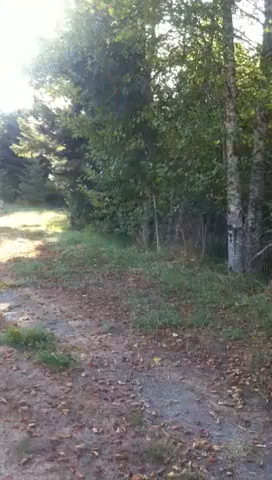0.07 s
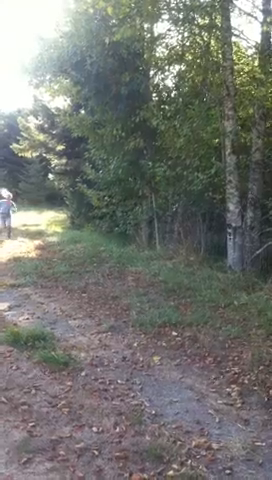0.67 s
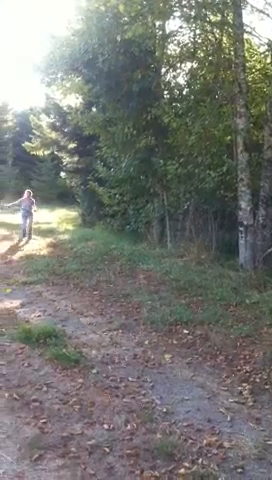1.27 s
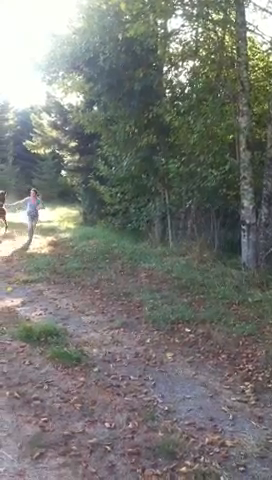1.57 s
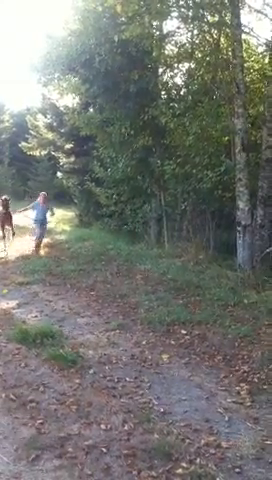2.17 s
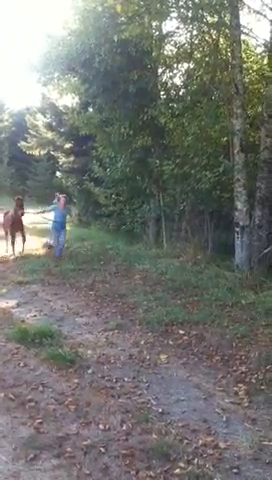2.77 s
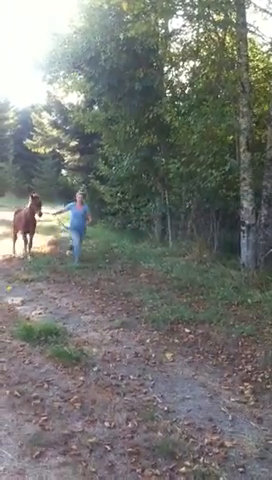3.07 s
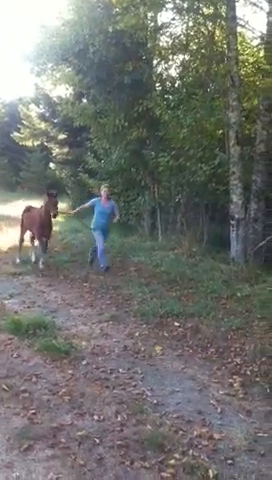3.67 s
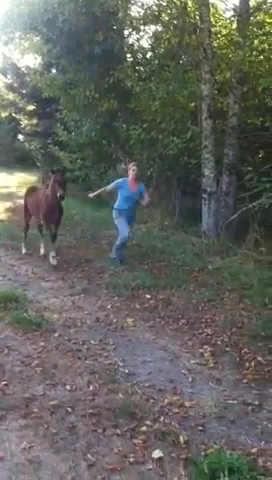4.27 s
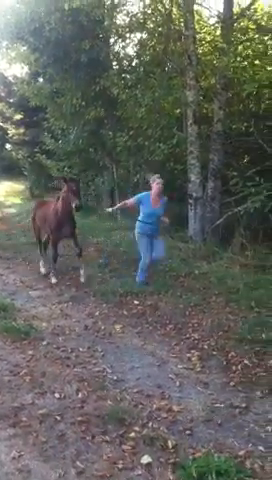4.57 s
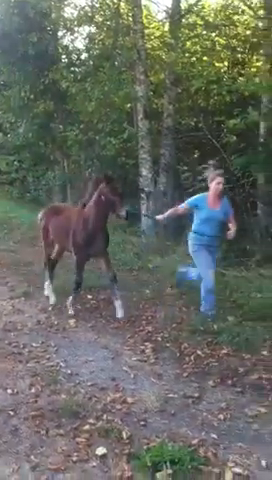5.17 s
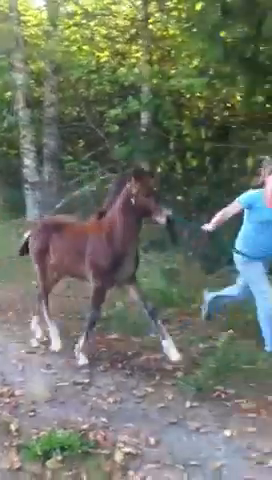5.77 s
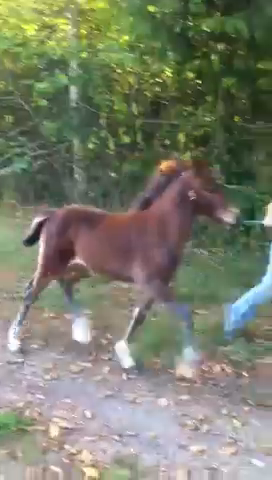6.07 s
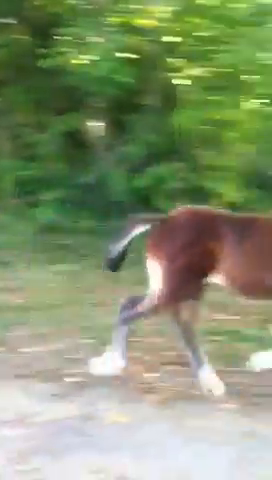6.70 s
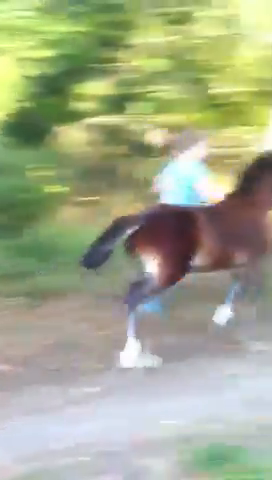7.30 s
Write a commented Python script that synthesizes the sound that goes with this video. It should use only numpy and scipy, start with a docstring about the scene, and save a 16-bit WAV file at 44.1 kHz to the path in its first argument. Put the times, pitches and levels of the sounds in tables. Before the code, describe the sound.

Against a quiet woodland hiss and a soft far-off roar, uneven footfalls approach through dry leaves. A running person and a trotting foal get steadily louder, crackling over leaf litter, twigs and a little gravel with a slight echo. Near the stationary microphone the steps sound drier, with dull thuds, hollow hoof knocks and the ticking of kicked leaves, before they begin to recede.

```python
"""A foal trots beside a running person on a woodland track, heard from one fixed mono microphone.
They start 16 to 18 m off, pass at about 3 m some six seconds in, and begin to move away.
Hooves and shoes sweep through dry leaves, snap twigs, grind gravel and thud on packed earth.
The trees scatter a short echo; behind it all lie a soft, distant roar and a fine hiss."""
import sys
import numpy as np
from scipy import signal
from scipy.io import wavfile
from scipy.ndimage import uniform_filter1d

SR = 44100
rng = np.random.default_rng(int(sys.argv[2]) if len(sys.argv) > 2 else 0)


def master_out(mix):
    """Clip the mix to full scale and print it as 16-bit PCM to the path in sys.argv[1]."""
    frames = np.transpose(np.atleast_2d(mix))
    ceiling = np.clip(frames, -1, 1)
    pcm = np.round(ceiling * 32767).astype(np.int16)
    wavfile.write(sys.argv[1], SR, pcm)


N = 332514
TIME = np.arange(N) / SR

# A foot ploughs into the litter: (time [s], relative level [dB], time to full weight [s], crispness [dB])
STEPS = [ (.766, -48.5, 0.022, 5), (0.805, -39, 0.0056, 4), (1.068, -47.5, 0.0071, 9),
         (1.145, -46.5, 0.014, 0), (1.38, -46.5, .03, -2.5), (1.415, -37.5, 0.074, 2),
         (1.668, -42, 0.0076, 1), (1.743, -34, 0.052, -1), (1.89, -47, .015, -3),
         (1.988, -41.5, 0.017, -6.5), (2.111, -33.5, 0.029, 1), (2.167, -30, 0.012, 0),
         (2.345, -39.5, 0.015, -1.5), (2.41, -40, 0.056, -2.5), (2.49, -33.5, .025, 2),
         (2.725, -36.5, 0.042, 2.5), (2.859, -34, .018, -0.5), (3.01, -35.5, 0.044, -1.5),
         (3.112, -36.5, 0.024, -1.5), (3.178, -38, 0.0084, 4), (3.30, -46, .06, 0.5),
         (3.453, -40, 0.024, -2.5), (3.56, -45, .012, 8), (3.63, -43, 0.04, 0.5), (3.79, -48, 0.065, 2.5),
         (3.861, -41, 0.073, 0.5), (4.098, -44, 0.12, 2.5), (4.242, -35.5, .015, -1),
         (4.376, -49.5, 0.049, -1.5), (4.462, -42, 0.025, -2.5), (4.53, -37, 0.049, 0.5),
         (4.765, -53, 0.086, -1), (4.831, -35, 0.11, -0.5), (5.083, -37, 0.18, 0),
         (5.391, -42.5, 0.027, 1.5), (5.424, -31.5, 0.0022, -0.5), (5.522, -33, 0.062, 1),
         (5.686, -35.5, 0.016, -2), (5.789, -41, 0.067, -5.5), (5.825, -33, 0.095, 2),
         (5.987, -38.5, .004, 4), (6.05, -45, 0.0047, 1), (6.121, -50, 0.072, 1.5),
         (6.198, -42.5, 0.006, -10), (6.236, -35.5, 0.053, 2), (6.428, -54.5, 0.0056, -7),
         (6.509, -46, 0.059, -2), (6.575, -36.5, 0.069, 0.5), (6.812, -33.5, 0.0069, -4),
         (6.89, -39.5, 0.025, 5.5), (6.949, -40.5, 0.013, 4.5), (7.019, -46.5, 0.02, 5),
         (7.081, -33.5, 0.0029, 0), (7.101, -47, 0.019, 3), (7.237, -44.5, 0.045, -1),
         (7.361, -38.5, 0.0025, -4.5)]
# Spectrum of dry stalks splintering: (frequency [Hz], level [dB])
TWIG_SPECTRUM = [(100, -29), (900, -17.5), (2000, -6), (5000, -5), (9000, 0), (16000, -7)]


def from_db(db):
    """Decibels to gain."""
    return 10 ** (np.asarray(db) / 20)


def unit(x):
    """Scales to rms 1."""
    return x / np.sqrt(np.mean(x ** 2) + 1e-20)


def at_time(points, s):
    """Reads a table along its time axis."""
    return np.interp(s, *np.transpose(points))


def at_frequency(points, hz):
    """Reads a table along a log-frequency axis."""
    f, value = np.transpose(points)
    return np.interp(np.log(hz + 1), np.log(f), value)


def add(mix, s, sound):
    """Mixes a sound in at time s."""
    part = mix[max(round(s * SR), 0):][:len(sound)]
    part += sound[:len(part)]


def colour(x, spectrum, size=2048):
    """Causal filter with the given spectrum, so that clicks stay sharp."""
    hz = abs(np.fft.fftfreq(size, 1 / SR))
    log_gain = np.log(from_db(at_frequency(spectrum, hz)))
    taps = np.fft.ifft(np.exp(np.conj(signal.hilbert(log_gain)))).real
    return signal.oaconvolve(x, taps)[:len(x)]


def mottle(x, depth_db, span_s, span_hz, size=256):
    """Lets the colour drift in random patches of time and frequency."""
    spectra = signal.stft(x, nperseg=size)[2]
    patches = rng.standard_normal(spectra.shape)
    for axis, memory in enumerate([np.exp(-SR / size / span_hz), np.exp(-size / 2 / SR / span_s)]):
        patches = signal.lfilter([1], [1, -memory], patches, axis=axis)
    spectra *= from_db(depth_db * unit(patches))
    return unit(signal.istft(spectra, nperseg=size)[1][:N])


def crackle(per_s, spread_db, ring_s, clump_db, clump_s, size=96):
    """Countless tiny fractures, mostly small, each with its own ring; they come in little avalanches."""
    strengths = from_db(spread_db * np.minimum(rng.exponential(1, N), 4.5))
    onsets = np.flatnonzero(rng.random(N) < per_s / SR)[:, None]
    lag = np.arange(size)
    noise_start = rng.integers(0, N, N)[onsets]
    rings = rng.standard_normal(N + size)[noise_start + lag] * np.exp(-lag / SR / ring_s)
    grains = np.bincount((onsets + lag).ravel(), (strengths[onsets] * rings).ravel(), N)[:N]
    strain = signal.lfilter([1], [1, -np.exp(-1 / SR / clump_s)], rng.standard_normal(N))
    avalanche = unit(strain - uniform_filter1d(strain, size=1000))  # a lull follows each burst
    return unit(grains * from_db(clump_db * avalanche))


def air(level_db=-68):
    """The ambience of the wood: a soft far-off roar and a fine hiss, slowly swelling together."""
    # Roar and hiss: (frequency [Hz], level [dB])
    spectrum = [(25, -13), (60, -30), (85, -21), (155, -8), (260, -8), (530, -10), (700, -6), (930, -4),
                (1250, -10.5), (2050, -17), (9000, -19.5), (16000, -19.5)]
    # Their rise and fall: (time [s], gain [dB])
    swell = [(0, 2.5), (1.5, 1.5), (2.4, 3.5), (3.1, 5.5), (4.5, 4.5), (5.5, 6.5), (7.5, 5)]
    noise = mottle(colour(rng.standard_normal(N), spectrum), depth_db=1, span_s=0.07, span_hz=201)
    return from_db(level_db + at_time(swell, TIME)) * noise


def woodland_echo(x, build_s=0.0087, reflections_per_s=2500):
    """Trunks and foliage scatter a thin echo back to the microphone; the treble rings longest."""
    # Decay among the trees: (frequency [Hz], time to fall 60 dB [s])
    decay = [(150, 0.32), (1000, 0.24), (4000, 0.82), (14000, 0.82)]
    reflections = rng.standard_normal(SR) * (rng.random(SR) < reflections_per_s / SR)
    hz, t, spectra = signal.stft(reflections, SR, nperseg=256)
    spectra *= from_db(-60 * t / at_frequency(decay, hz)[:, None])
    tail = signal.istft(spectra, SR, nperseg=256)[1]
    tail *= np.clip(np.arange(len(tail)) / SR / build_s, 0, 1)
    return signal.oaconvolve(x, tail / np.linalg.norm(tail))[:N]


def stirring_leaves():
    """Kicked leaves fall back and uncurl with small ticks, loudest as the pair passes the microphone."""
    ticks = crackle(per_s=900, spread_db=3, ring_s=0.0005, clump_db=1.5, clump_s=0.01)
    level_db = np.interp(TIME, [0.3, 4.5, 6.2, 7.5], [-80, -73, -62, -68])
    return unit(colour(ticks, TWIG_SPECTRUM)) * from_db(level_db)


def distance(s, near_m=3):
    """How far the feet are from the microphone at time s, in multiples of near_m."""
    # The pair's way along the track: (time [s], distance [m])
    path = [(0, 16.3), (2, 18.4), (4, 8.2), (5, 5.77), (6.2, 3.16), (7, 3.88), (7.5, 5.2)]
    return at_time(path, s) / near_m


def step_db(t, s, db, press_s, contact_db=-3, quick_s=0.0056):
    """Level of the step at time s, t seconds after contact: weight comes on, then the leaves settle."""
    # Leaves settle faster after a quick step; scatter on the way draws out a distant one.
    settle_db_per_s = 225 * (1 + quick_s / press_s) / distance(s) ** 0.27
    weight = np.clip(t / press_s, 0, 1)
    return db + contact_db * (1 - weight) - settle_db_per_s * np.maximum(t - press_s, 0)


def step_power(s, db, press_s, touch_s=0.0015, touch_share=0.02):
    """Power of one step; a slow foot also touches down more softly."""
    t = TIME - s
    touch = np.clip(t / (touch_s + touch_share * press_s), 0, 1)
    level_db = np.maximum(step_db(t, s, db, press_s), -150)
    return (from_db(level_db) * touch) ** 2


def stalk_breaks(per_step=4, above_step_db=8, spread_db=7, within_s=0.1, pitch_hz=(3300, 8800)):
    """Leaf stalks break by chance under each step: rows of (time [s], level [dB], pitch [Hz])."""
    breaks = []
    for s, db, press_s, _ in STEPS:
        for late, weak, thin in rng.random((per_step, 3)):
            delay_s = late * (press_s + within_s)
            break_db = step_db(delay_s, s, db, press_s) + above_step_db - spread_db * weak
            breaks.append((s + delay_s, break_db, np.interp(thin, [0, 1], pitch_hz)))
    return breaks


def twigs(level_db=-2, ring_share=0.65, ring_s=0.0011, splinter_s=0.0013, lag_s=0.00109, size=800):
    """A twig or stalk breaks underfoot with a splintering burst and a very short ring."""
    # Twigs breaking on the track: (time [s], relative peak [dB], pitch [Hz])
    snaps = [(1.7425, -26, 6550), (1.9981, -18, 2850), (2.1145, -23, 6860), (2.3446, -22, 3760),
             (3.0116, -18.5, 3700), (3.459, -20.5, 7740), (4.0948, -17, 5020), (4.134, -30, 8300),
             (4.374, -21, 5860), (4.4604, -20, 6100), (4.6347, -28, 5270), (4.7494, -33, 7340),
             (4.817, -25.5, 8800), (4.8415, -18.5, 6000), (5.0809, -21.5, 3570), (5.1323, -21, 3700),
             (5.3652, -34.5, 3630), (5.4253, -18, 4500), (5.5202, -20.5, 8500), (5.7687, -25.5, 8500),
             (5.8065, -22, 5360), (5.9262, -21, 5300), (6.0489, -25.5, 4870), (6.171, -29, 6200),
             (6.4294, -27.5, 5780), (6.994, -25, 6200), (7.01, -23.5, 6700), (7.0672, -25, 6000),
             (7.1074, -23.5, 2000), (7.3591, -26, 2760), (7.446, -34.5, 6870)]
    out, t = np.zeros(N), np.arange(size) / SR
    tearing = 1 - np.exp(-t / (0.57 * splinter_s))  # fibres tear one after another
    splinters = tearing * np.exp(-t / splinter_s)
    for s, db, hz in snaps + stalk_breaks():
        crack = unit(colour(rng.standard_normal(size) * splinters, TWIG_SPECTRUM))
        ring = unit(np.sin(2 * np.pi * hz * t) * np.exp(-t / ring_s))
        snap = crack + ring_share * ring
        add(out, s + lag_s, from_db(db + level_db) * snap / abs(snap).max())
    return out


def blow(t, hz, db, swell_s):
    """A heavily damped mode, pushed softly through the leaves."""
    return from_db(db) * t / swell_s * np.exp(1 - t / swell_s) * np.sin(2 * np.pi * hz * t)


def thuds(level_db=-3, crumble_share=0.54, crumble_s=0.012, size=4096):
    """The earth gives a dull push, the hoof knocks, and soil crumbles under it."""
    # Weight lands on the track: (time [s], relative level [dB], pitch [Hz], hollow hoof knock [dB])
    landings = [ (0.244, -49, 189, -15), (.878, -45.5, 304, -20), (1.152, -42, 298, -20),
                (1.409, -42.5, 190, -13), (1.76, -41, 235, -18), (2.03, -41, 303, -23),
                (2.859, -34.5, 303, -16), (3.113, -44, 199, -17), (3.707, -41, 328, -24),
                (3.955, -42.5, 278, -17), (4.267, -45.5, 267, -28), (4.559, -44.5, 188, -3),
                (5.114, -44.5, 228, 2.5), (5.136, -38.5, 298, -17), (5.281, -51, 263, -8),
                (5.419, -47.5, 280, 4), (5.443, -47, 180, -21), (5.707, -42.5, 260, 8),
                (5.932, -50.5, 290, -12), (6.014, -47, 193, -8), (6.06, -47, 256, 2.5),
                (6.314, -45.5, 235, -1), (6.337, -44, 255, -6), (6.56, -34, 285, 0),
                (6.596, -41.5, 380, -1), (6.831, -36, 358, -7), (6.835, -38, 141, -20),
                (6.841, -35.5, 304, -12), (7.105, -33.5, 340, 1.5), (7.272, -46.5, 355, -20),
                (7.376, -47, 270, 2), (7.409, -32.5, 320, -7.5)]
    # Packed earth: (multiple of the landing's pitch, level [dB], time to peak [s])
    earth_modes = [(.6, -11.5, .005), (1, -1, 0.0047), (1.5, -5, 0.003)]
    # Hoof horn: (nominal frequency [Hz], level [dB], time to peak [s])
    hoof_modes = [(857, -9.5, 0.0042), (997, -2.5, 0.0021), (1435, -2, 0.0011), (2050, -6, 0.0009),
                  (2660, -11, 0.0023)]
    # Crumbling soil: (frequency [Hz], level [dB])
    soil_spectrum = [(30, -28), (90, -19), (160, 1), (380, 1.5), (600, -13.5), (1200, -11), (4000, -48)]
    out, t = np.zeros(N), np.arange(size) / SR
    for s, db, hz, knock_db in landings:
        earth = sum(blow(t, hz * ratio, mode_db, swell_s) for ratio, mode_db, swell_s in earth_modes)
        hoof = sum(blow(t, mode_hz * rng.uniform(0.88, 1.058), mode_db + knock_db, swell_s)
                   for mode_hz, mode_db, swell_s in hoof_modes)
        soil = unit(colour(rng.standard_normal(size), soil_spectrum)) * np.exp(-t / crumble_s)
        add(out, s, from_db(db + level_db) * (earth + hoof + crumble_share * soil))
    low_cut = signal.butter(2, 105, "highpass", fs=SR, output="sos")  # a small foot radiates no deep bass
    return signal.sosfilt(low_cut, out)


def litter(leaf_db=-3, crisp_db=-5, gravel_db=2, cushion=0.61):
    """Each step crushes leaves, shatters their dry edges and grinds gravel, which crisp leaves cushion."""
    # Crushed leaves: (frequency [Hz], level [dB])
    leaf_spectrum = [(100, -41), (900, -24.5), (1400, -16), (2050, -18.5), (2500, -8), (2950, -3),
                     (4200, -1.5), (5900, 0), (8000, -6), (12000, -10), (16000, -6)]
    # Shattering dry edges: (frequency [Hz], level [dB])
    crisp_spectrum = [(100, -47), (2500, -24), (5000, -11), (7000, -3.5), (10000, -3), (13000, -3),
                      (16000, -14)]
    # Grinding gravel: (frequency [Hz], level [dB])
    gravel_spectrum = [(30, -14.5), (90, -32), (170, -1), (300, 3.5), (540, -6), (800, 3), (1300, 0.5),
                       (2200, 4), (3500, -3), (8000, -23.5)]
    # The leaves thin out towards the bare track: (time [s], gain of the gravel under a step [dB])
    bareness = [(0, -18), (5, -15.5), (5.9, -17), (6.6, -16), (7.4, -9.5)]
    leaf_power, crisp_power, gravel_power = np.zeros((3, N))
    for s, db, press_s, crispness_db in STEPS:
        power = step_power(s, db, press_s)
        leaf_power += power / from_db(crispness_db) ** 2
        crisp_power += power * from_db(crispness_db) ** 2
        gravel_power += power * from_db(at_time(bareness, s) - cushion * crispness_db) ** 2
    fractures = crackle(per_s=6500, spread_db=2.5, ring_s=0.00043, clump_db=0.56, clump_s=0.011)
    stones = crackle(per_s=2200, spread_db=2.5, ring_s=0.00077, clump_db=1.5, clump_s=0.0032)
    leaves = mottle(colour(fractures, leaf_spectrum), depth_db=3, span_s=0.0033, span_hz=304)
    edges = mottle(colour(fractures, crisp_spectrum), depth_db=2, span_s=0.01, span_hz=400)
    gravel = mottle(colour(stones, gravel_spectrum), depth_db=3.5, span_s=0.013, span_hz=198)
    return (from_db(leaf_db) * np.sqrt(leaf_power) * leaves
            + from_db(crisp_db) * np.sqrt(crisp_power) * edges
            + from_db(gravel_db) * np.sqrt(gravel_power) * gravel)


def scene(far_echo_db=-12, near_echo_db=-17):
    """From beside the track, the feet sound louder and drier as they come near."""
    feet = (litter() + twigs() + thuds()) / distance(TIME) + stirring_leaves()
    echo_db = np.interp(TIME, [1, 6], [far_echo_db, near_echo_db])
    return (feet + woodland_echo(feet * from_db(echo_db)) + air())[None]


def record(dry, open_s=0.082, fade_s=0.0037, edge_hz=16000):
    """The microphone opens after a moment and takes in sound up to edge_hz."""
    opened = dry * np.clip((TIME - open_s) / fade_s, 0, 1)
    high_cut = signal.firwin(401, edge_hz, window=("kaiser", 7), fs=SR)
    return signal.oaconvolve(opened, high_cut[None], "same")


dry = scene()
out = record(dry)
master_out(out)
```